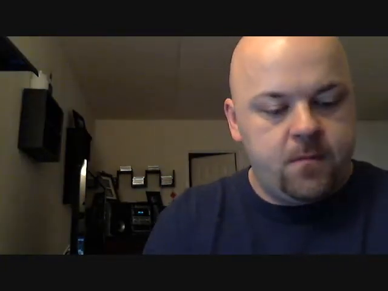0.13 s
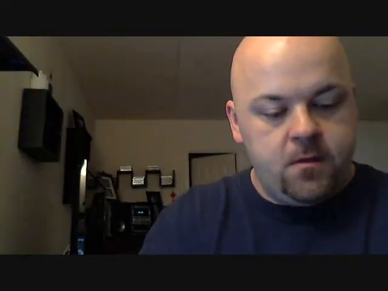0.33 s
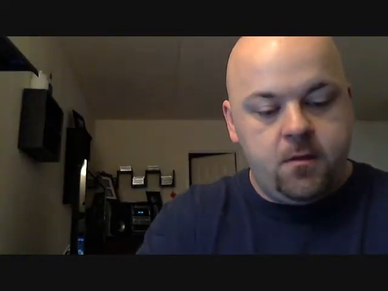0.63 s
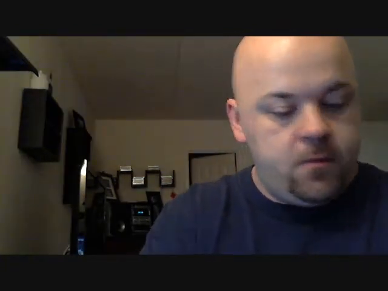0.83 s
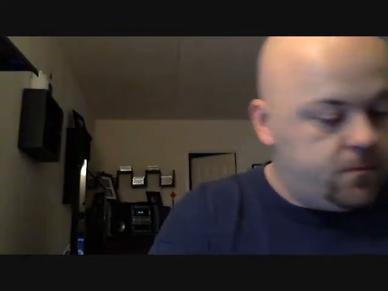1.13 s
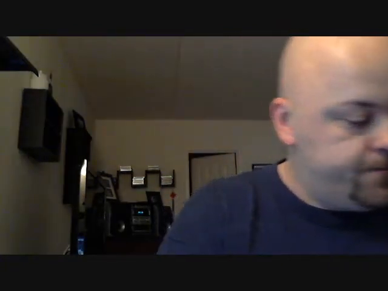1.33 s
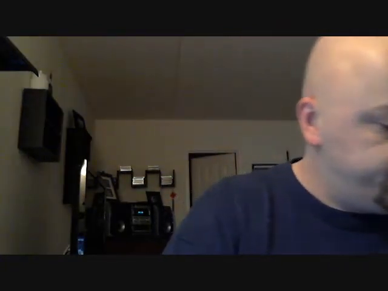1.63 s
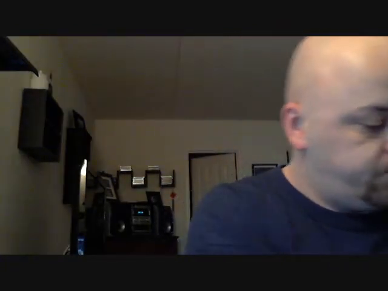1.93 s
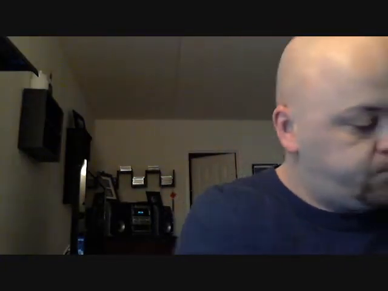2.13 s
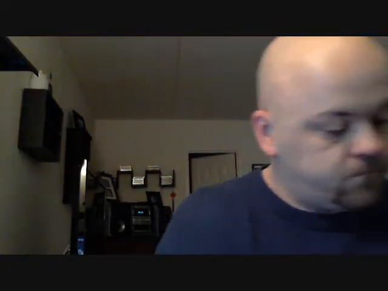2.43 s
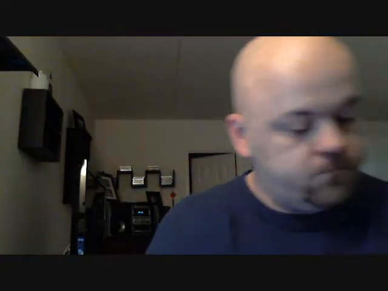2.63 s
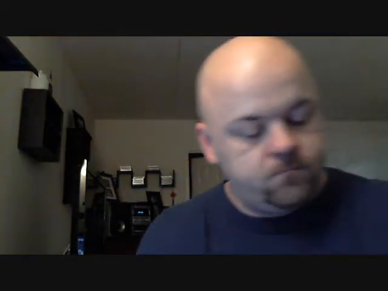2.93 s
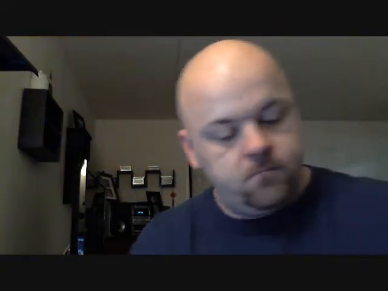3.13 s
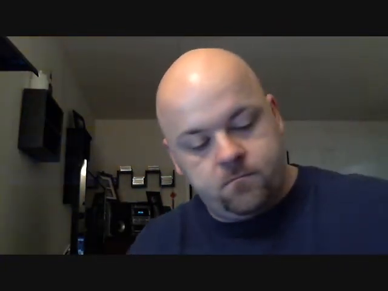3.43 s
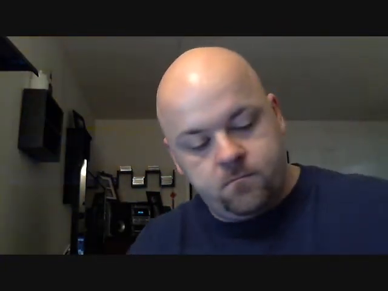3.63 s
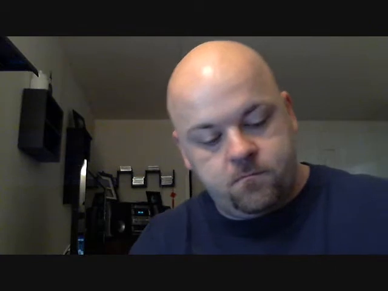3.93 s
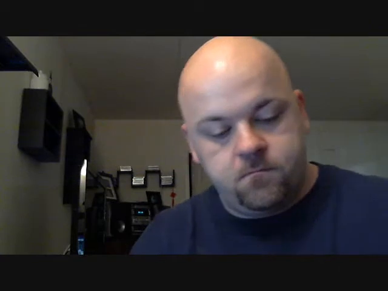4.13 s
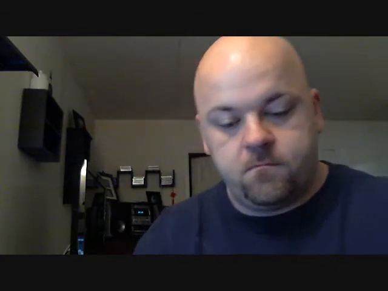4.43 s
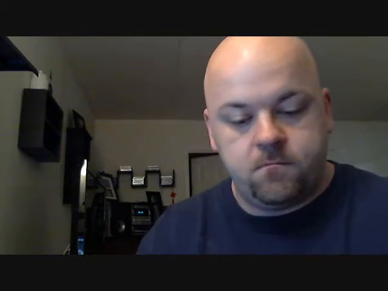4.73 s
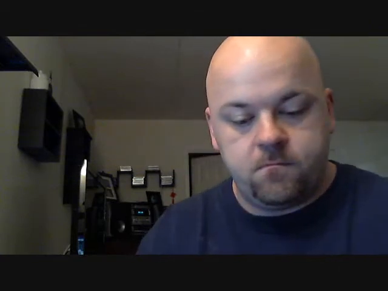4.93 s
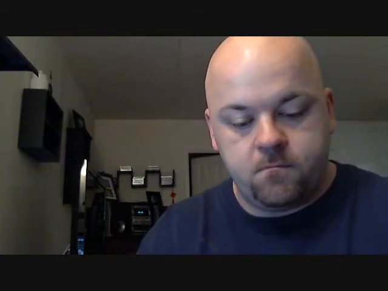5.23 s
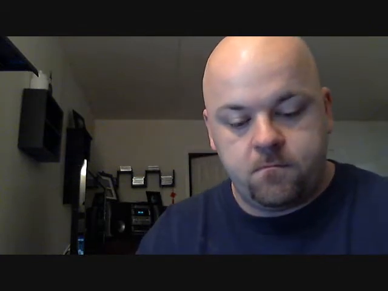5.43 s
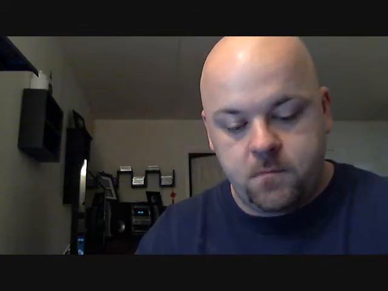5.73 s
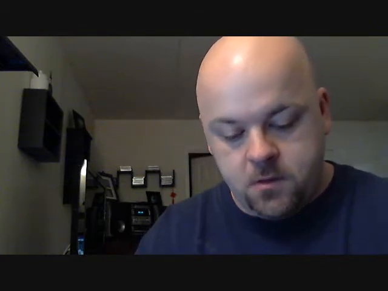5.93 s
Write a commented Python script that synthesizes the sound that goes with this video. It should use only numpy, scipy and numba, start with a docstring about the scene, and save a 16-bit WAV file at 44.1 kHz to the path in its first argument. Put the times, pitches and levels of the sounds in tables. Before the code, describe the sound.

Close, dry paper handling: an early knock and crisp snap, a quieter lull of faint rubbing, then swelling rustles and scattered crackles over faint hum.

```python
"""Faint hum and hiss, and almost at once hands working a paper envelope on a wooden desk in a quiet room.
Snaps: gritty noise bursts, which also drive decaying modes of sheet and desk top.
Slides: noise and fibre ticks in five layers, swelling and fading with each stroke of the hands.
Hum and hiss: coloured noise. One close microphone feeds both channels.
"""
import sys
import numpy as np
from scipy import signal
from scipy.fft import rfft, irfft, next_fast_len
from scipy.io import wavfile
from scipy.ndimage import uniform_filter1d
from numba import njit

SR = 44100
rng = np.random.default_rng(int(sys.argv[2]) if len(sys.argv) > 2 else 0)


def put_to_file(sound):
    """Save the sound as 16-bit audio at rate SR, in the file named by the first command-line argument."""
    columns = np.atleast_2d(sound).T  # one column per channel
    safe = np.clip(columns, -1, 1)
    whole_steps = np.round(safe * 32767)
    wavfile.write(sys.argv[1], SR, whole_steps.astype(np.int16))


N = 268343

# room hum and microphone hiss, relative spectrum: freq_hz, density_db [dB per Hz]
FLOOR_SPECTRUM = [(30, 10), (60, 6.5), (100, -2.5), (134, -2.5), (250, -9.5), (415, -21.5), (2900, -27.5),
                  (3140, -21), (3490, -31), (8000, -31.5), (11000, -34), (16000, -46.5)]
# colour of rubbed paper, relative spectrum: freq_hz, density_db [dB per Hz]
RUB_SPECTRUM = [(220, -59), (380, -21.5), (512, -0.5), (809, -2.5), (1110, -8), (1340, 0), (2080, -11),
                (2390, -2), (3780, -6), (4350, -7.5), (7910, 3), (14800, -27.5), (16300, -41)]
# pocket of air between the sheets: centre_hz, width_hz, boost_db
AIR_POCKET = [(2078, 220, 13.5), (3930, 170, 6.5), (6300, 1100, -3), (7600, 1200, -5.5)]
# modes of the desk top: freq_hz, level_db, t60_s
DESK_MODES = [(135, -11, .12), (212, 0, .12), (260, -2, .06), (305, -5, .05), (366, -8, .08)]
# modes of the folded sheet: freq_hz, level_db, t60_s
SHEET_MODES = [(565, -11.5, 0.058), (630, -11, 0.032), (736, -2, 0.041), (853, -1, 0.093),
               (1072.5, 4, 0.037), (1280, -7, 0.044), (1417, 0, 0.016), (1481, 5, 0.049)]
# snaps and knocks, sharp ones first: start_s, crack_db, sheen_db, sheet_db, sheet_pitch_hz, desk_db,
# t60_s [held to 0.005-0.3], rise_ms [time constant]
SNAPS = [(0.06, -32.5, -42.5, -29, 1410, -38, 0.044, 1.04),
         (0.1228, -34, -41, -33.5, 562, -19.5, 0.077, 0.47),
         (0.4453, -26, -20.5, -10.5, 527, -1, 0.068, 0.41), (0.452, -49, -49, -7.5, 1025, -49, 0.012, 0.51),
         (0.4973, -36, -37.5, -19.5, 1080, -12.5, 0.083, 0.29),
         (0.5851, -23, -16, -14.5, 637, -18.5, 0.089, 0.42),
         (0.5917, -13.5, -28, -13.5, 686, -11, 0.17, 0.7),
         (0.5995, -9.5, -23, -14.5, 1380, -28, 0.13, 0.46), (0.8108, -26, -78, -22, 656, -22, 0.12, 0.28),
         (0.8472, -48, -47.5, -45.5, 853, -33, 0.065, 0.38),
         (1.3726, -40, -38.5, -40, 1583, -41, 0.084, 0.38),
         (1.6607, -37, -63, -45.5, 1560, -66.5, 0.12, 0.74),
         (1.939, -59, -54, -61.5, 892, -61.5, 0.069, 0.4), (2.4343, -48, -52, -47.5, 841, -54, 0.044, 0.27),
         (3.3675, -41.5, -38, -41, 1530, -77.5, 0.075, 0.42),
         (3.7832, -29, -49, -39, 1320, -59, 0.04, 0.85),
         (4.3668, -55.5, -59, -50.5, 1660, -50, 0.099, 0.34),
         (4.6579, -28, -27.5, -32, 600, -40, 0.082, 0.48),
         (5.0021, -15.5, -20, -25.5, 614, -26.5, 0.069, 1.24),
         (5.1116, -30.5, -43, -36.5, 516, -45, 0.031, 0.4),
         (5.1981, -46, -43.5, -49.5, 733, -66, 0.083, 0.32),
         (5.4784, -23.5, -21, -30, 613, -73, 0.11, 0.28), (5.8737, -32.5, -36, -37, 785, -78, 0.065, 0.55),
         (0.0254, -38, -37.5, -29, 1550, -44.5, 0.086, 4.9), (0.38, -54, -47, -46, 1020, -52, 0.16, 3),
         (0.7774, -51.5, -62, -55, 455, -33, 0.34, 9.7),
         (1.2436, -48.5, -47, -44.5, 502, -39.5, 0.072, 2.1),
         (1.3119, -50.5, -45, -46, 703, -59, 0.066, 2.46),
         (1.6944, -63, -50, -65.5, 1646, -64, 0.026, 2.07),
         (1.9195, -66, -57, -49.5, 1417, -64, 0.024, 2.7),
         (2.0413, -58.5, -80.5, -52, 858, -59.5, 0.049, 4.5), (2.1454, -76, -85, -56, 622, -74, 0.061, 2.9),
         (2.3306, -56, -56.5, -55.5, 903, -55, 0.042, 2.6), (2.5197, -50, -55, -40.5, 936, -58, 0.078, 4.7),
         (2.5314, -41.5, -54, -40.5, 920, -64, 0.043, 3), (2.5504, -46, -46, -40, 740, -53, 0.027, 2.1),
         (2.5925, -45.5, -35, -42, 736, -54, 0.065, 1.5), (2.6544, -44, -50.5, -44, 930, -56, 0.065, 5.3),
         (2.7054, -61, -58, -43, 740, -48, 0.019, 1.4), (2.8074, -52, -45.5, -47, 710, -58, 0.087, 2.5),
         (3.0939, -50, -52, -50, 472, -37, 0.12, 3.6), (3.1098, -43.5, -45.5, -43, 800, -63, 0.12, 3.9),
         (3.5478, -46.5, -54, -50, 868, -74, 0.051, 5.1), (4.1574, -33, -47, -45, 615, -55, 0.096, 4.4),
         (4.1969, -34.5, -52, -32, 623, -41, 0.054, 3.8), (4.4094, -77, -77, -68, 569, -53, 0.064, 1.64),
         (4.6324, -43.5, -45, -44.5, 510, -53, 0.24, 1.3), (4.7591, -29.5, -59, -34, 630, -78, 0.045, 2.5),
         (4.9187, -52, -59, -64, 555, -48, 0.043, 4.2), (5.1003, -30, -35, -42, 549, -58, 0.04, 2.1),
         (5.3802, -49.5, -55, -58.5, 544, -52.5, 0.046, 4), (5.5059, -34, -38, -42, 1480, -65, 0.086, 3.3),
         (5.6186, -36, -41.5, -36.5, 536, -72, 0.015, 1.7), (5.6501, -35, -50, -62, 595, -73, 0.045, 3.6),
         (5.8184, -33.5, -33, -30.5, 620, -40.5, 0.05, 12), (5.8514, -53, -45, -34, 644, -75.5, 0.023, 2.7),
         (5.9574, -45, -43, -46, 564, -53, 0.093, 6.8), (5.9704, -36.5, -34.5, -32.5, 680, -64, 0.06, 5.4)]
# range edges of a snap (loose, rasp, sheen): edge_hz
SNAP_EDGES_HZ = (450, 1800, 4800, 16400)
# fibre ticks in the rubbing: time_s, ticks_db [re hiss]
TICK_SHARE = [(0, 5.5), (1.4, -1.5), (2.3, -5.5), (2.95, -3), (3.15, -17), (3.6, -12), (4.2, -9),
              (4.6, -2.5), (5.3, -6.5), (5.55, -11), (5.8, -6.5), (6.09, -1.5)]
# strokes of the hands: full_s, rise_s, hold_s, fade_s [rise and fade: per SWING_DB, before layer scale],
# rasp_db, scrape_db, scrape_hz [resonance], flap_db, desk_db, swish_db, swish_hz [centre]
STROKES = [(0.057, 0.28, 0.0087, 0.15, -67, -72.5, 1350, -70, -62, -62.5, 7500),
           (0.136, 0.045, 0.0063, 0.044, -47, -77, 1400, -46, -37, -61, 7040),
           (0.379, 0.015, 0.031, 0.23, -61.5, -60, 1210, -65, -40, -69.5, 5900),
           (0.468, .04, 0.065, 0.18, -52, -38.5, 1065, -38, -37, -47, 6500),
           (0.621, .08, 0.0067, 0.095, -35.5, -28, 1270, -25.5, -18.5, -47, 5700),
           (0.667, 0.055, 0.0041, 0.3, -46, -40, 1280, -43, -33.5, -52, 5700),
           (0.727, 0.3, 0.032, 0.073, -61, -51, 1500, -57, -41.5, -63.5, 6060),
           (0.817, 0.043, 0.04, 0.11, -68, -47, 1570, -52, -44, -58, 6300),
           (0.918, 0.052, .005, .08, -62, -83, 1730, -78, -74.5, -53.5, 7800),
           (0.962, 0.03, 0.0033, 0.084, -67, -60, 1390, -66.5, -71, -45, 8300),
           (1.112, 0.2, 0.0051, .15, -76.5, -84, 1300, -86.5, -80.5, -66.5, 6200),
           (1.256, 0.044, 0.0056, .1, -52.5, -61, 1260, -46.5, -42, -60, 5550),
           (1.335, 0.07, 0.036, 0.13, -43.5, -42, 1870, -45.5, -54, -44, 7400),
           (1.394, 0.061, 0.042, .04, -67, -56, 1300, -58.5, -50, -68, 8100),
           (1.469, 0.11, 0.041, 0.097, -94, -68.5, 1100, -80, -70.5, -56, 9080),
           (1.506, 0.11, 0.076, 0.078, -81, -62.5, 1144, -68, -77.5, -71, 8940),
           (1.698, 0.11, 0.0048, 0.087, -82, -61, 1820, -71, -82, -49.5, 9500),
           (1.917, 0.053, 0.0046, 0.11, -51, -57.5, 1410, -69.5, -76.5, -54, 6170),
           (2.331, 0.022, 0.0058, 0.14, -63.5, -60, 1770, -58, -54.5, -52.5, 8200),
           (2.448, 0.14, 0.0095, 0.33, -51, -51.5, 1435, -57, -57, -51.5, 6270),
           (2.519, 0.061, 0.028, 0.38, -50.5, -57, 1250, -52.5, -67, -50, 6600),
           (2.644, 0.11, 0.041, 0.13, -52.5, -53, 1910, -49, -79, -50.5, 6300),
           (2.796, 0.15, .005, 0.11, -49, -55, 1800, -44.5, -63, -56, 6260),
           (2.89, 0.36, 0.034, 0.073, -49.5, -56, 1680, -54.5, -78, -49.5, 6370),
           (3.04, 0.061, 0.026, 0.17, -54, -64.5, 1800, -49, -41.5, -56.5, 7540),
           (3.099, 0.1, 0.022, .06, -59, -56, 1710, -41.5, -37.5, -54, 7200),
           (3.14, 0.064, 0.068, 0.23, -42.5, -49.5, 1700, -46.5, -57, -39, 6800),
           (3.288, 0.33, .01, 0.64, -50.5, -42.5, 1700, -53.5, -68, -68, 6540),
           (3.38, 0.077, 0.098, 0.15, -39.5, -46, 1690, -45, -54, -38, 6200),
           (3.628, 0.035, .005, 0.18, -69, -76, 1780, -72.5, -60.5, -54.5, 6300),
           (3.75, 0.17, 0.038, 0.091, -43.5, -66.5, 1390, -60.5, -74, -41.5, 6000),
           (3.797, 0.026, 0.13, 0.53, -38, -45.5, 1584, -49, -65, -35, 6000),
           (3.87, 0.17, 0.088, 0.29, -37, -43, 1820, -44, -58, -35.5, 7600),
           (3.972, 0.23, 0.12, 0.2, -31, -41, 1830, -47, -61, -27, 6600),
           (4.137, 0.11, 0.022, 0.13, -44, -45, 2170, -54, -50, -31, 6560),
           (4.214, 0.04, 0.0073, .06, -55, -51, 2010, -56, -51, -68, 6000),
           (4.396, .2, 0.0082, .4, -86, -85, 1600, -91, -82, -70.5, 7200),
           (4.593, 0.02, 0.041, .15, -68, -77.5, 2080, -67.5, -74, -55, 6880),
           (4.702, 0.14, 0.0061, 0.063, -41, -46, 1910, -43.5, -41.5, -42.5, 6480),
           (4.788, 0.23, 0.041, 0.15, -57.5, -63.5, 2140, -59.5, -66, -57, 7000),
           (4.911, .05, .04, 0.078, -50.5, -83, 2120, -55, -65, -65, 5960),
           (4.963, .05, 0.12, 0.34, -39, -50.5, 1970, -47, -54.5, -41, 6500),
           (5.127, 0.19, 0.028, 0.11, -47, -52, 1720, -57, -45, -52, 7000),
           (5.214, 0.086, 0.027, 0.051, -58, -76.5, 1337, -78, -81.5, -77, 6600),
           (5.361, .02, 0.092, .03, -85, -86, 2000, -61.5, -75, -88, 7200),
           (5.38, 0.022, 0.11, .1, -52.5, -76, 2000, -60.5, -66.5, -55.5, 7100),
           (5.513, 0.06, 0.025, 0.41, -34, -43, 1900, -45, -54.5, -36, 7100),
           (5.645, 0.12, 0.048, .1, -45, -75, 2160, -55.5, -58, -50, 7100),
           (5.749, 0.36, 0.063, 0.17, -39.5, -46.5, 1600, -46, -74, -41.5, 6800),
           (5.895, 0.5, 0.0037, 0.12, -52, -45, 2160, -48.5, -73, -55.5, 6700),
           (5.963, 0.036, .004, .08, -38, -32.5, 1940, -41, -66, -66, 5900),
           (5.994, .03, .005, 0.32, -56, -42, 1840, -52.5, -54.5, -43, 6130)]
# per layer (rasp, scrape, flap, desk, swish): level between strokes [dB]
REST_DB = (-88.5, -89, -82, -76, -90.5)
# same layers: multiples of the stroke's rise_s and fade_s [ratio]
RISE_SCALE = (0.58, 0.91, 0.38, 1.1, 0.72)
FADE_SCALE = (0.78, 0.7, 0.87, 0.47, 0.7)

FLOOR_DB = -62
SWING_DB = 40
BEND = 1.165  # over 1: rounded top, steeper ends
BASS_CUT_HZ, TOP_HZ = 112, 16400


def undb(db):
    """Amplitude ratio of a level in dB."""
    return 10 ** (np.asarray(db) / 20)


def unit(x):
    """Scale to rms 1."""
    return x / np.sqrt(np.mean(x ** 2))


def crest(x):
    """Scale each row so that its loudest moment has rms 1."""
    power = uniform_filter1d(x ** 2, size=400)
    return x / np.sqrt(power.max(axis=1, keepdims=True))


def curves(table):
    """Columns of a time table, interpolated to every sample."""
    time_s, *columns = np.transpose(table)
    return [np.interp(np.arange(N) / SR, time_s, column) for column in columns]


def walk(rate_hz):
    """Random levels, slewed from one to the next in 1 / rate_hz seconds; spread near 1."""
    hold = max(int(SR / rate_hz), 1)
    levels = rng.standard_normal(N // 8)[:N // hold + 1]
    return 1.2 * uniform_filter1d(np.repeat(levels, hold), hold)[:N]


def colour(table, hz):
    """Gain of a (freq_hz, level_db) spectrum on a log-frequency axis."""
    table_hz, db = np.transpose(table)
    return undb(np.interp(np.log(hz + 1), np.log(table_hz), db))


def bands(x, gain, edges_hz):
    """Colour x, then part it into neighbouring ranges."""
    size = next_fast_len(x.shape[-1])
    hz = np.fft.rfftfreq(size, 1 / SR) + 1
    spectrum = rfft(x, size) * gain(hz)
    for low_hz, high_hz in zip(edges_hz, edges_hz[1:]):
        slopes = np.sqrt((1 + (low_hz / hz) ** 12) * (1 + (hz / high_hz) ** 12))
        yield irfft(spectrum / slopes, size)[..., :x.shape[-1]]


@njit
def svf(x, hz, damping):
    """State-variable band-pass with a moving centre."""
    y, band, low = np.empty(len(x)), 0., 0.
    for i in range(len(x)):
        g = np.tan(np.pi * hz[i] / SR)
        v = (band + g * (x[i] - low)) / (1 + g * (g + damping))
        band, low, y[i] = 2 * v - band, low + 2 * g * v, damping * v
    return y


def resonate(x, hz, damping):
    """A moving resonance, passed twice, at an even level wherever it sits."""
    y = svf(svf(x, hz, damping), hz, damping)
    return y / np.sqrt(uniform_filter1d(y ** 2, size=4000) + 1e-12)


def mode(hz, t60_s, t):
    """One mode of a struck body: a sine that decays by 60 dB in t60_s."""
    return np.sin(2 * np.pi * hz * t) * 1000. ** (-t / t60_s)


def paper(hz):
    """Spectrum of rubbed paper, shaped by the resonances of the air pocket."""
    boost_db = sum(db / (1 + (2 * (hz - f) / width) ** 2) for f, width, db in AIR_POCKET)
    return colour(RUB_SPECTRUM, hz) * undb(boost_db)


def floor():
    """Low hum of the room and hiss of the microphone: coloured noise, wavering a little."""
    size = next_fast_len(N)
    gain = colour(FLOOR_SPECTRUM, np.fft.rfftfreq(size, 1 / SR))
    noise = irfft(rfft(rng.standard_normal(size)) * gain, size)[:N]
    return unit(noise) * undb(FLOOR_DB + 1.8 * walk(4))


def ring(modes, t, spread_db, near_hz=None, focus_db=22.0):
    """One ring of a body for each blow; the spot that is hit reweights the modes."""
    out = 0
    for hz, db, t60_s in modes:
        chance = rng.standard_normal((len(SNAPS), 2))
        wave = mode(hz * (1 + .01 * chance[:, :1]), t60_s, t)
        if near_hz is not None:
            # modes far from near_hz are weakened
            octaves = np.abs(np.log2(near_hz / hz))
            db = db - focus_db * np.minimum(octaves * 3, 1.5)
        out = out + undb(db + spread_db * chance[:, 1:]) * wave
    return out


def snaps(push=0.17, front_db=21.0, front_s=0.003, rattle=0.46):
    """A crease lets go in a gritty burst with a hard front, which also shakes the sheet and the desk."""
    columns = np.transpose(SNAPS)[:, :, None]
    start_s, crack_db, sheen_db, sheet_db, sheet_hz, desk_db, t60_s, rise_ms = columns
    t = np.arange(4500) / SR
    chance = rng.standard_normal((len(SNAPS), 2, len(t)))
    grit_db = 12 * uniform_filter1d(chance[:, 1], size=20)
    noise = chance[:, 0] * undb(grit_db)
    loose, rasp, sheen = bands(noise, paper, SNAP_EDGES_HZ)

    rise = 1 - np.exp(-1000 * t / np.maximum(rise_ms, .05))
    fade = rise * 1000. ** (-t / np.clip(t60_s, .005, .3))
    burst = fade * undb(front_db * np.exp(-t / front_s))

    # the bodies are pushed by a shorter part of the same noise
    drive = noise * fade ** (1 / push)
    rings = ring(SHEET_MODES, t, 2.0, sheet_hz), ring(DESK_MODES, t, 2.0)
    sheet, desk = (signal.fftconvolve(drive, r, axes=1)[:, :len(t)] for r in rings)
    sheet = crest(sheet) + rattle * crest(loose * fade)

    parts = zip((rasp * burst, sheen * burst, sheet, desk), (crack_db, sheen_db, sheet_db, desk_db))
    end_fade = np.minimum(4 * (1 - t / t[-1]), 1)
    bursts = sum(undb(db) * crest(x) for x, db in parts) * end_fade
    out = np.zeros(N + len(t))
    for start, sound in zip((start_s[:, 0] * SR).astype(int), bursts):
        out[start:start + len(t)] += sound
    return out[:N]


def fibres(grit_db=0.0, ticks_per_s=580.0, scatter_db=5.0, tick_s=0.0035):
    """Fibres catching and slipping: hiss, with small breaks of unequal size on top."""
    hiss = rng.standard_normal(N) * undb(grit_db * walk(900))
    hits = rng.random(N) < ticks_per_s / SR
    breaks = hits * undb(scatter_db * np.minimum(rng.exponential(size=N), 3))
    decay = np.exp(-1 / (tick_s * SR))
    ticks = signal.lfilter([1], [1, -decay], breaks) * rng.standard_normal(N)
    return unit(hiss) + undb(curves(TICK_SHARE)[0]) * unit(ticks)


def strokes():
    """Every stroke swells, holds and fades; resonances follow the strokes, weighted by their power."""
    columns = np.transpose(STROKES)[:, :, None]
    full_s, rise_s, hold_s, fade_s, rasp_db, scrape_db, scrape_hz, flap_db, desk_db, swish_db, swish_hz = columns
    coarse_s, fine_s = np.arange(0, N, 32) / SR, np.arange(N) / SR
    tops_db = rasp_db, scrape_db, flap_db, desk_db, swish_db
    powers = []
    for top_db, rise_scale, fade_scale in zip(tops_db, RISE_SCALE, FADE_SCALE):
        before = np.maximum(full_s - coarse_s, 0) / (rise_scale * rise_s)
        after = np.maximum(coarse_s - full_s - hold_s, 0) / (fade_scale * fade_s)
        level_db = top_db - SWING_DB * (before + after) ** BEND
        powers.append(undb(np.maximum(level_db, -200)) ** 2)
    gains = []
    for power, rest_db in zip(powers, REST_DB):
        gain = np.sqrt(power.sum(axis=0) + undb(rest_db) ** 2)
        gains.append(np.interp(fine_s, coarse_s, gain))
    pitches = []
    for power, hz in ((powers[1], scrape_hz), (powers[4], swish_hz)):
        mean_hz = (power * hz).sum(axis=0) / power.sum(axis=0)
        pitches.append(np.interp(fine_s, coarse_s, mean_hz))
    return gains, pitches


def slide(flutter_db=2.24, flap_flutter_db=3.5, desk_flutter_db=3.5, swish_share=0.19, crease_share=0.27):
    """Rubbed paper in four layers, the desk in a fifth; bending the sheet moves its resonances."""
    gains, (scrape_hz, swish_hz) = strokes()
    rasp_gain, scrape_gain, flap_gain, desk_gain, swish_gain = gains
    grains, edge_grains = fibres(), fibres()
    flap, scrape = (unit(b) for b in bands(grains, paper, (450, 1000, 2400)))
    rasp, sheen = (unit(b) for b in bands(edge_grains, paper, (2400, 4800, 16400)))

    t = np.arange(SR // 5) / SR
    desk_ring = sum(undb(db) * mode(hz, t60_s, t) for hz, db, t60_s in DESK_MODES)
    desk = unit(signal.oaconvolve(grains, desk_ring)[:N])

    scrape = .4 * scrape + .7 * resonate(grains, scrape_hz, .32)
    # passing creases lend the rasp a narrow colour that wanders quickly
    crease_hz = 3400 * 2 ** np.clip(0.44 * walk(17), -.5, .5)
    rasp = (1 - crease_share) * rasp + crease_share * resonate(rasp, crease_hz, 0.18)
    swish = (1 - swish_share) * sheen + swish_share * resonate(sheen, swish_hz, 0.5)

    out = flap * flap_gain * undb(flap_flutter_db * walk(60))
    out = out + desk * desk_gain * undb(desk_flutter_db * walk(22))
    for layer, gain in ((scrape, scrape_gain), (rasp, rasp_gain), (swish, swish_gain)):
        out = out + layer * gain * undb(flutter_db * walk(50))
    return out


def scene():
    """One close microphone feeds both channels."""
    mono = floor() + snaps() + slide()
    return np.array([mono, mono])


def record(dry):
    """The microphone drops the deep bass, the converter clips at full scale and the top is cut."""
    bass_cut = signal.butter(4, BASS_CUT_HZ, "high", fs=SR, output="sos")
    top_cut = signal.ellip(10, .2, 80, TOP_HZ, fs=SR, output="sos")
    thin = signal.sosfilt(bass_cut, dry)
    return signal.sosfilt(top_cut, np.clip(thin, -1, 1))


dry = scene()
out = record(dry)
put_to_file(out)
```